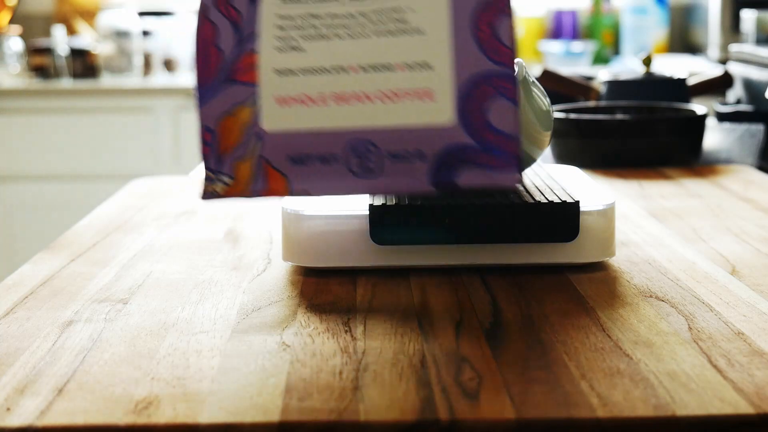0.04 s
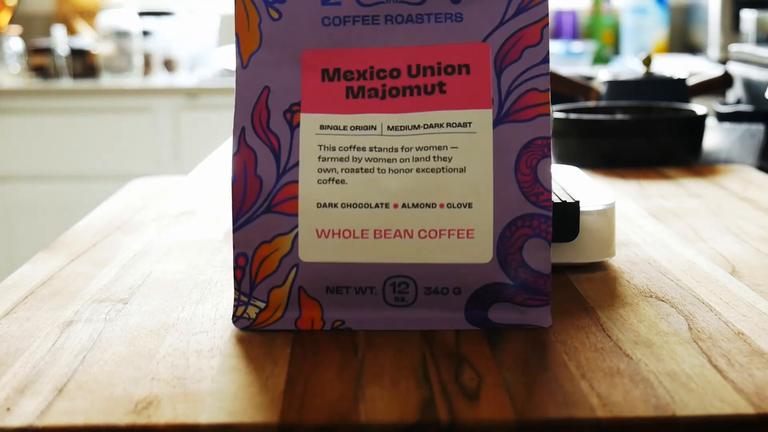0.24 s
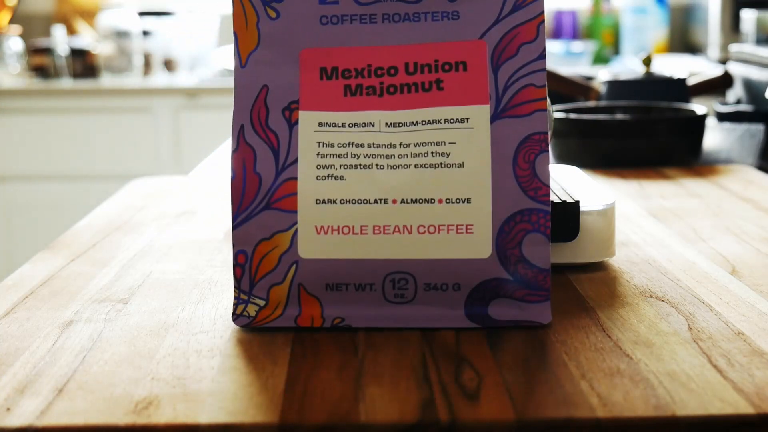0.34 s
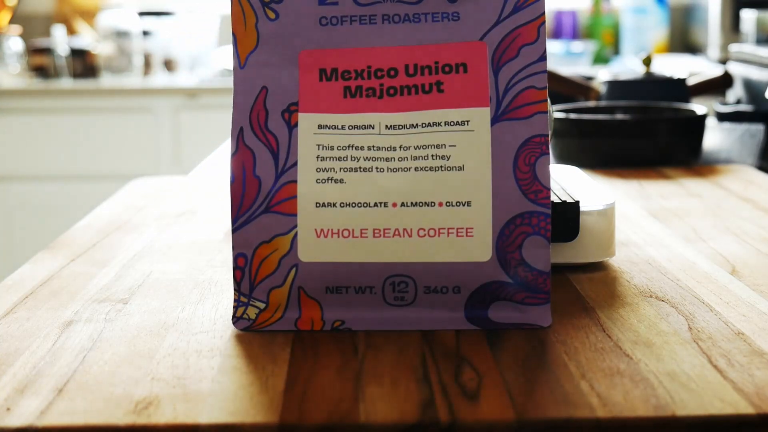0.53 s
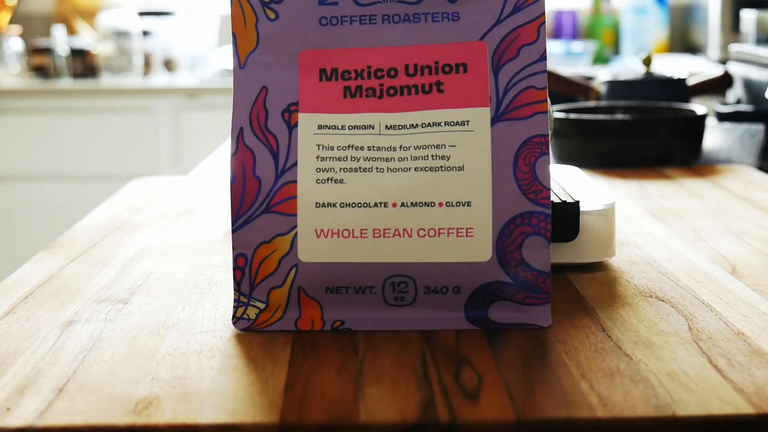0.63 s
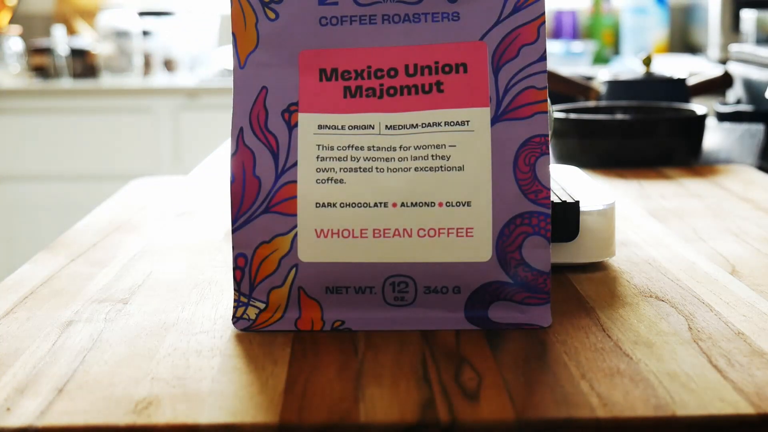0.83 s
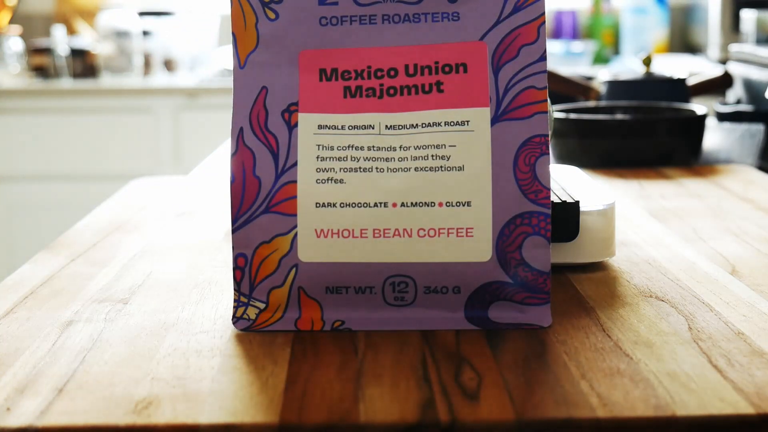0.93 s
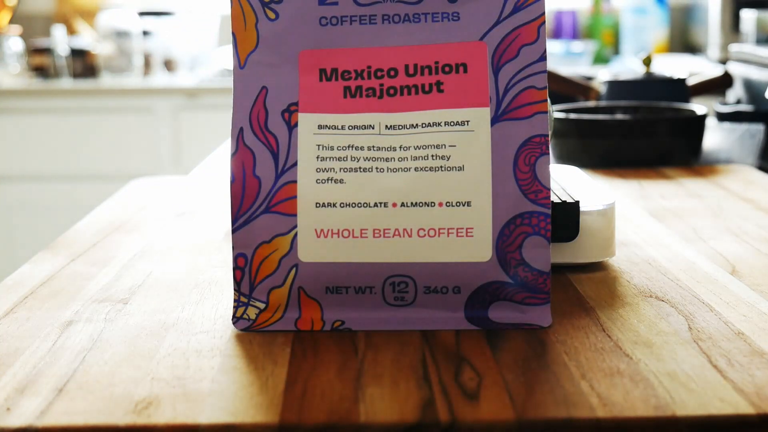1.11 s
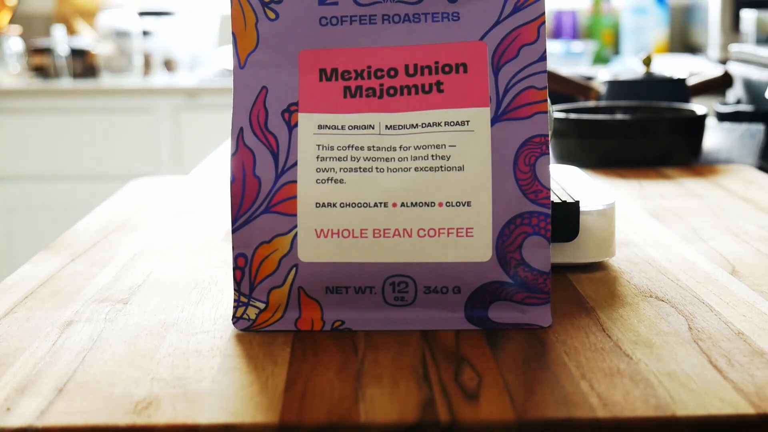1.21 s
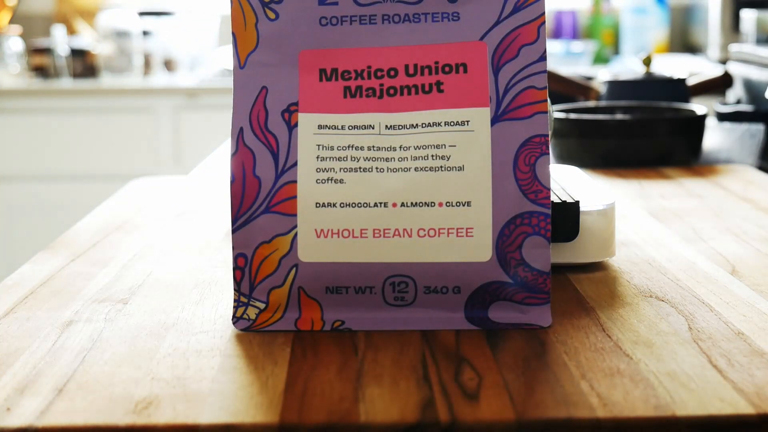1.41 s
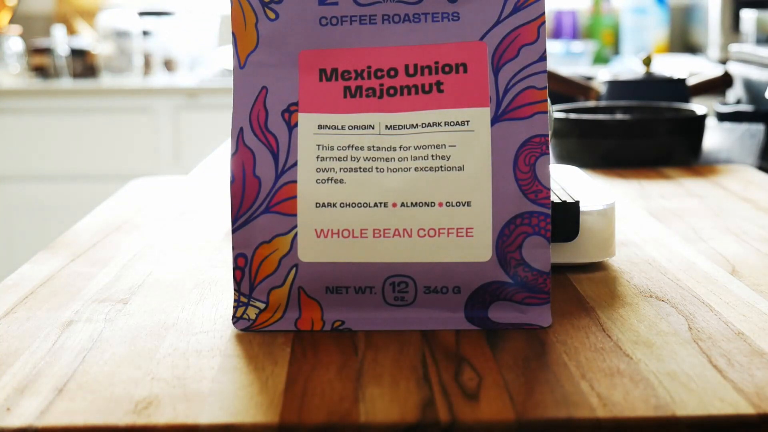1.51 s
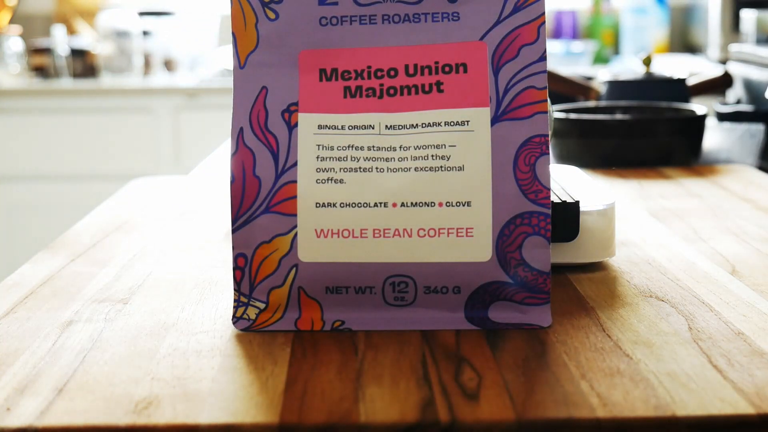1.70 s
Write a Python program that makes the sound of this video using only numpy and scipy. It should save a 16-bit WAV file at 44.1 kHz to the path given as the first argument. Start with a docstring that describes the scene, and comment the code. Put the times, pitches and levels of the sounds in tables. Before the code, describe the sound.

A paper bag of coffee beans thuds onto a wooden counter, the beans briefly rattling.

```python
"""A paper bag of coffee beans is set down close by on a wooden kitchen counter.
One edge touches, then the base slaps down: the impact excites the damped modes of wood and bag.
Colliding beans rattle to rest, the paper crackles under load and the bag rocks with a few soft knocks.
The kitchen reverberates briefly. An appliance hums, and faint rustles come before and after."""
import sys
import numpy as np
from scipy import signal
from scipy.fft import rfft, irfft, next_fast_len
from scipy.io import wavfile
from scipy.ndimage import map_coordinates

SR = 44100
rng = np.random.default_rng(int(sys.argv[2]) if len(sys.argv) > 2 else 0)


def generate_wav(sig):
    """Save sig (samples, or channels by samples) to the path in sys.argv[1] as 16-bit PCM at SR."""
    pcm = np.round(np.clip(np.atleast_2d(sig).T, -1, 1) * 32767).astype(np.int16)
    wavfile.write(sys.argv[1], SR, pcm)


N = 77175
T = np.arange(N) / SR

# the appliance's tones: (frequency [Hz], level [dB])
HUM_TONES = [(122, -66.5), (238, -58), (398.4, -57.5), (598, -61.5), (856, -67)]
# faint strokes on the bag: (peak time [s], level [dB], 20 dB rise [s], 20 dB fall [s])
RUSTLES = [(.015, -61.5, .06, .07), (.086, -59, .025, .055), (.183, -49, .04, .14), (.843, -48, .06, .08),
           (1.195, -62, .04, .14), (1.376, -53, .08, .07), (1.447, -56, .04, .085), (1.74, -57, .1, .15)]
# the base meets the wood: (time [s], click level [dB], crackle level [dB], crackle t60 [s])
SLAPS = [(0.2184, -28, -25.5, 0.021), (0.2201, -14, -29, .016), (0.2235, -8.5, -19.5, 0.024),
         (0.2249, 4.5, -16.5, 0.031)]
# the weight lands, then the bag rocks: (time [s], ring level [dB], crunch level [dB])
KNOCKS = [(.2200, -32.5, -24.5), (.2245, -24, -38.5), (.2385, -34, -32), (.258, -38, -34),
          (.280, -30.5, -49), (0.2873, -30, -31), (0.31, -36, -27), (0.346, -38, -38),
          (.3615, -25.5, -33.5), (.448, -34, -39.5)]
# modes of counter and bag: (frequency [Hz], relative level [dB], t60 [s])
COUNTER_MODES = [(197, -19.5, 0.087), (267, -8.5, 0.087), (356, -14, 0.061), (525, -7.5, 0.061),
                 (564, -8.5, 0.045), (619, -12.5, 0.063), (769.6, -14, 0.1), (873, -25, 0.12),
                 (997, -18, 0.03), (1246, -4.5, .04), (1370, -10.5, .04)]
# cushioned pushes on the counter: (centre time [s], frequency [Hz], level [dB])
THUMPS = [(.228, 264, -23), (.279, 317, -29), (0.317, 185, -32.5), (0.383, 362, -32.5)]
# the kitchen's reverberation time: (frequency [Hz], t60 [s])
ROOM_T60 = [(100, 0.4628), (500, 0.53), (2000, 0.68), (5000, 0.63), (9000, 0.6), (14000, 0.31)]

# spectra of the sources and the reverberation: (frequency [Hz], relative level [dB])
AIR_SPECTRUM = [(25, -31), (55, -33), (80, -18), (120, -7.5), (155, -7), (185, -1), (270, -1.5),
                (340, -5.5), (460, -7.5), (650, -9), (850, -13.5), (1100, -19), (1600, -22.5), (3000, -30),
                (5000, -31), (7000, -32.5), (8200, -36.5), (12000, -41), (15000, -44.5)]
RUSTLE_SPECTRUM = [(300, -26), (1700, -11), (2700, -1), (4500, -1), (7000, -2), (8000, -9.5), (12000, -11),
                   (15000, -19.5)]
ROOM_SPECTRUM = [(100, 3), (7000, -2), (11000, -4.5), (13000, -3.5)]
SLAP_SPECTRUM = [(50, -26), (130, -22), (260, -2), (600, 1.5), (1200, -3.5), (1900, -4), (3400, 2),
                 (5000, 0), (6600, -6), (7600, -20.5), (9500, -10.5), (12200, -13), (15000, -28)]
CRUNCH_SPECTRUM = [(50, -32), (110, -1), (200, -11.5), (400, -9), (700, -0.5), (1250, 0.5), (1900, 1),
                   (3500, -10), (8000, -29), (15000, -43)]
BEAN_SPECTRUM = [(40, -32), (100, -19.5), (240, -6.5), (400, -1), (620, 1.5), (850, 0.5), (1250, -2.5),
                 (1700, -6.5), (2800, -2.5), (3600, -11), (5000, -24.5), (6800, -11), (8000, -16),
                 (10500, -30), (12500, -51), (15000, -47)]
CRUMPLE_SPECTRUM = [(60, -42), (300, -22), (1500, -16), (3200, 0.5), (5500, -10), (7000, -0.5), (8000, -15),
                    (10800, -13), (12500, -21), (15000, -27)]

# likeness of left and right; NEAR is for beans and paper: (frequency [Hz], coherence [0..1])
AIR_COHERENCE = [(30, 0.0889), (55, 1), (110, 0.81), (250, 0.93), (370, 0.53), (550, 0.71), (850, 0.55),
                 (1200, 0.44), (1900, 0.21), (3500, 0.52), (6800, 0.63), (8500, .33), (14000, 0.14)]
RUSTLE_COHERENCE = [(1500, 0.98), (3500, .82), (6800, 0.91), (8500, 0.56)]
ROOM_COHERENCE = [(100, 0.9), (700, 0.85), (1800, 0.7), (6000, 0.91), (8500, .45), (13000, 0.42)]
SLAP_COHERENCE = [(100, 0.88), (6500, .97), (9000, 0.48)]
NEAR_COHERENCE = [(40, .3), (100, 0.8), (1000, 1), (2000, 0.98), (6500, .86), (8500, .62), (13000, .65)]


def amp(db):
    """Amplitude grows tenfold for every 20 dB."""
    return 10 ** (np.asarray(db) / 20)


def unit_rms(x):
    """Normalisation to unit mean power."""
    return x / np.sqrt(np.mean(x ** 2) + 1e-20)


def curve_at(points, hz):
    """Interpolation of (frequency, value) points on a logarithmic frequency axis."""
    freqs, values = np.transpose(points)
    return np.interp(np.log(hz + 1), np.log(freqs + 1), values)


def filtered(x, response):
    """Linear filtering multiplies the spectrum by a frequency response."""
    size = next_fast_len(N + SR // 2)
    return irfft(rfft(x, size) * response(np.fft.rfftfreq(size, 1 / SR)), size)[..., :N]


def coloured(x, spectrum, size=4096):
    """Convolution with a minimum-phase response of unit energy imposes a spectral shape."""
    cepstrum = irfft(np.log(amp(curve_at(spectrum, np.fft.rfftfreq(size, 1 / SR)))))
    cepstrum[1:size // 2] *= 2  # folding onto positive time makes the filter causal
    cepstrum[size // 2 + 1:] = 0
    response = irfft(np.exp(rfft(cepstrum)))
    return signal.fftconvolve(x, response[None] / np.linalg.norm(response), axes=1)[:, :N]


def stereo(pair, coherence):
    """Mid-side mixing gives two independent signals the stated left-right coherence."""
    def weights(hz):
        angle = np.arccos(np.clip(curve_at(coherence, hz), -1, 1)) / 2
        return np.array([np.cos(angle), np.sin(angle)])
    mid, side = filtered(pair, weights)
    return np.array([mid + side, mid - side])


def wobble(per_s):
    """Slow random modulation: a spline through Gaussian values."""
    return map_coordinates(rng.standard_normal(int(N * per_s / SR) + 4), [T * per_s])


def ticks(per_s, spread_db):
    """Shot noise: two independent streams of tiny random contacts, at unit rms."""
    strength = rng.choice([-1, 1], (2, N)) * amp(spread_db * rng.standard_normal((2, N)))
    return unit_rms(strength * (rng.random((2, N)) < per_s / SR))


def decay(start, t60):
    """Exponential damping: from its start the envelope loses 60 dB every t60 seconds."""
    return (T >= start) * amp(-60 * np.abs(T - start) / t60)


def appliance_hum(air_db=-47.5):
    """Broadband air noise underlies tones with slight amplitude and phase modulation."""
    air = unit_rms(stereo(coloured(rng.standard_normal((2, N)), AIR_SPECTRUM), AIR_COHERENCE))
    tones = np.zeros(N)
    for hz, db in HUM_TONES:
        peak = np.sqrt(2) * amp(db + 1.07 * wobble(per_s=6.06))
        tones += peak * np.sin(2 * np.pi * hz * T + 0.27 * wobble(per_s=4.65))
    return amp(air_db) * air + tones


def rustles(room_db=-15):
    """Sliding friction, as of fingers or a sleeve on the bag: dense tiny contacts merge into swishes."""
    strokes = sum(amp(db - 20 * np.maximum((peak - T) / rise, (T - peak) / fall))
                  for peak, db, rise, fall in RUSTLES)
    grain = coloured(ticks(per_s=9200, spread_db=1), RUSTLE_SPECTRUM)
    swish = strokes * unit_rms(stereo(grain, RUSTLE_COHERENCE))
    return swish + amp(room_db) * kitchen_reverb(swish)


def kitchen_reverb(x, delay_s=0.005):
    """Diffuse reflections form a noise tail in which each frequency decays at its own rate."""
    hz, age, noise = signal.stft(rng.standard_normal((2, SR)), SR, nperseg=256)
    tail_db = curve_at(ROOM_SPECTRUM, hz)[:, None] - 60 * age / curve_at(ROOM_T60, hz)[:, None]
    _, tail = signal.istft(noise * amp(tail_db), SR, nperseg=256)
    tail *= np.arange(tail.shape[1]) / SR > delay_s
    tail /= np.linalg.norm(tail[0])
    reflections = signal.fftconvolve(x.mean(axis=0)[None], tail, axes=1)[:, :N]
    return stereo(reflections, ROOM_COHERENCE)


def base_slap(room_db=0.2):
    """Brief impacts are broadband: the stiff base clicks and crackles, and the clicks excite the room."""
    impulses, strain = np.zeros((1, N)), np.zeros(N)
    for start, click_db, crackle_db, t60 in SLAPS:
        impulses[0, round(start * SR)] += amp(click_db)
        strain += amp(crackle_db) * decay(start, t60)
    clicks = coloured(impulses, SLAP_SPECTRUM)
    crackle = stereo(coloured(strain * rng.standard_normal((2, N)), SLAP_SPECTRUM), SLAP_COHERENCE)
    return clicks + crackle + amp(room_db) * kitchen_reverb(clicks)


def counter_knocks(rise_s=0.00058, crunch_t60_s=0.044):
    """Modal vibration: each shift of weight rings counter and bag, with a dull crunch of beans."""
    ring, force = np.zeros(N), np.zeros(N)
    for start, ring_db, crunch_db in KNOCKS:
        age = np.maximum(T - start, 0)
        attack = 1 - np.exp(-age / rise_s)
        for hz, mode_db, t60 in COUNTER_MODES:
            detuned_hz = hz * (1 + rng.normal(0, 0.022))
            swing = np.sin(2 * np.pi * (detuned_hz * age + rng.random()))
            gain = amp(ring_db + mode_db + 2 * rng.standard_normal())
            ring += gain * attack * decay(start, t60) * swing
        force += amp(crunch_db) * decay(start, crunch_t60_s)
    crunch = coloured(force * ticks(per_s=6000, spread_db=0), CRUNCH_SPECTRUM)
    return ring + stereo(crunch, NEAR_COHERENCE)


def bean_rattle(start, level_db=-29, rise_s=0.0029, hold_s=0.047, fall_db_per_s=190):
    """Inelastic collisions: hundreds of beans click against each other and the bag, losing energy."""
    age = T - start
    attack = np.clip(age / rise_s, 0, 1)
    motion = attack * amp(level_db - fall_db_per_s * np.maximum(age - hold_s, 0))
    collisions = motion * ticks(per_s=2200, spread_db=4)
    return stereo(coloured(collisions, BEAN_SPECTRUM), NEAR_COHERENCE)


def paper_crumple(start, level_db=-33, fall_db_per_s=230):
    """Buckling: the paper wall crackles in small, uneven snaps as it takes the load."""
    strain = (T > start) * amp(level_db - fall_db_per_s * np.abs(T - start))
    snaps = strain * ticks(per_s=1100, spread_db=5.5)
    return stereo(coloured(snaps, CRUMPLE_SPECTRUM), NEAR_COHERENCE)


def counter_thumps(half_width_s=0.0051):
    """A cushioned force holds only low frequencies: the weight drives the counter through a few swings."""
    return sum(amp(db) * np.exp(-((T - centre) / half_width_s) ** 2)
               * np.sin(2 * np.pi * hz * (T - centre)) for centre, hz, db in THUMPS)


def scene(load_s=0.225, room_db=-7, low_cut_hz=36):
    """Superposition of the landing, which radiates little deep bass, the rustles and the hum."""
    settling = counter_knocks() + bean_rattle(load_s) + paper_crumple(load_s)
    landing = base_slap() + counter_thumps() + settling + amp(room_db) * kitchen_reverb(settling)
    low_cut = signal.butter(2, low_cut_hz, "high", fs=SR, output="sos")
    return signal.sosfilt(low_cut, landing) + rustles() + appliance_hum()


def record(dry):
    """Band limiting: an ideal low-pass filter removes the highest treble."""
    return filtered(dry, lambda hz: hz < 15450)


dry = scene()
out = record(dry)
generate_wav(out)
```